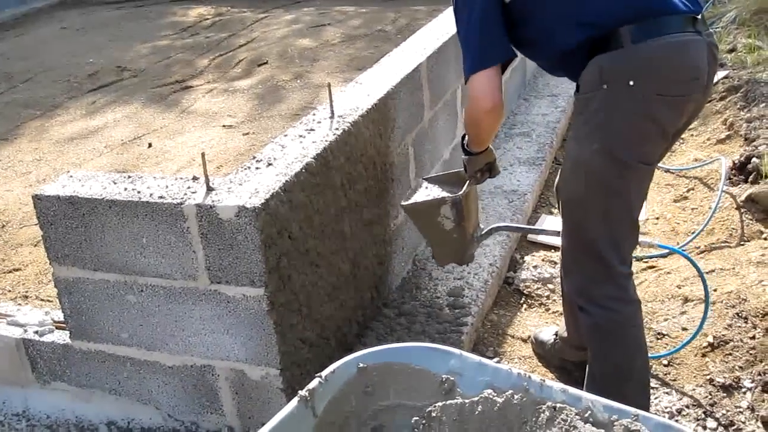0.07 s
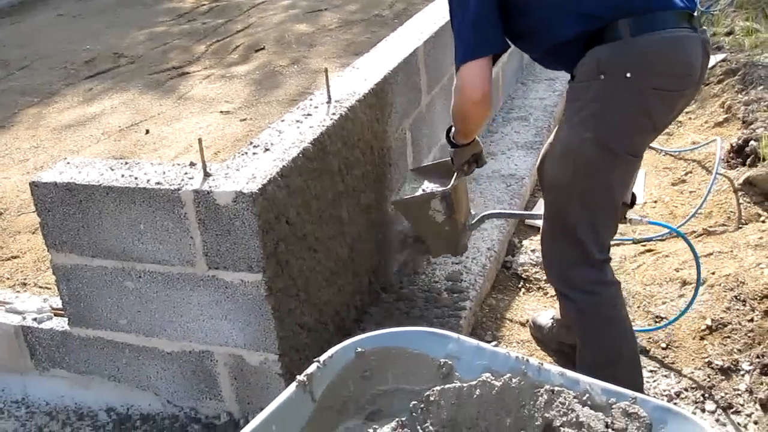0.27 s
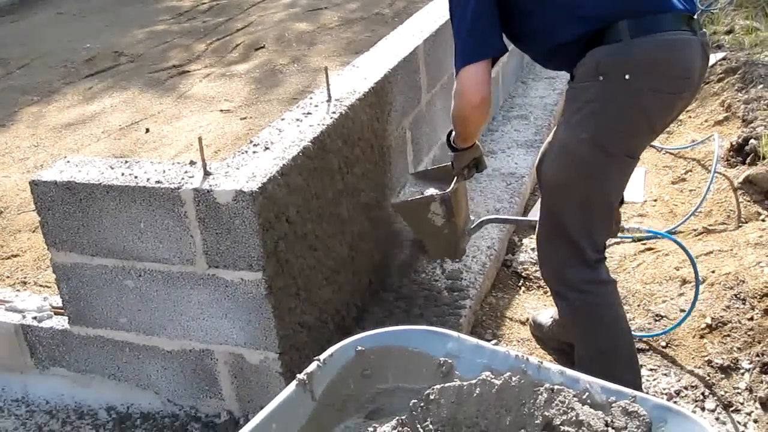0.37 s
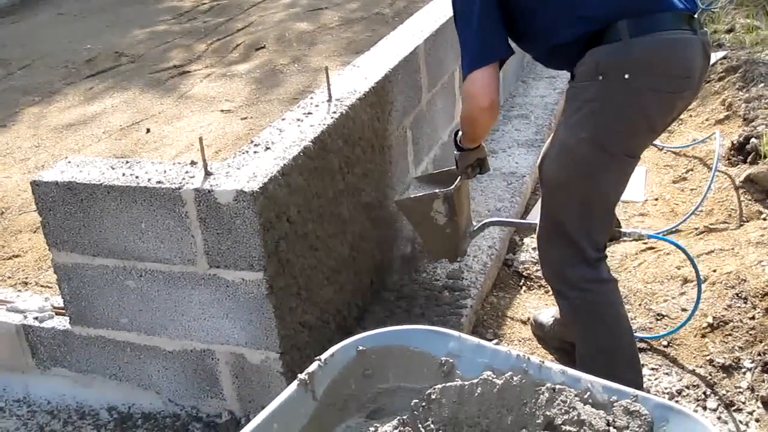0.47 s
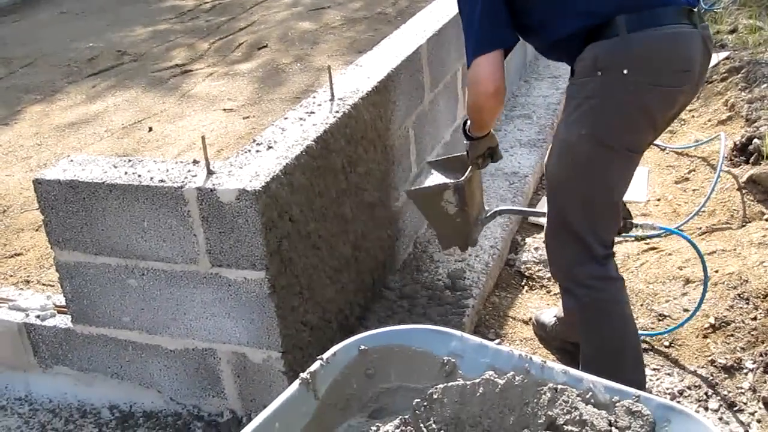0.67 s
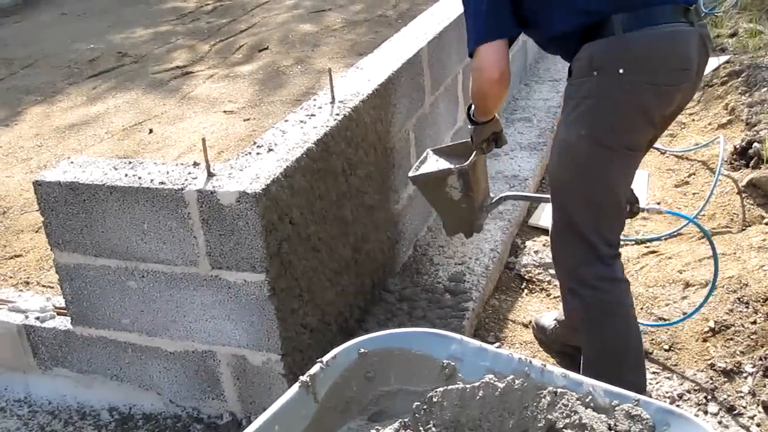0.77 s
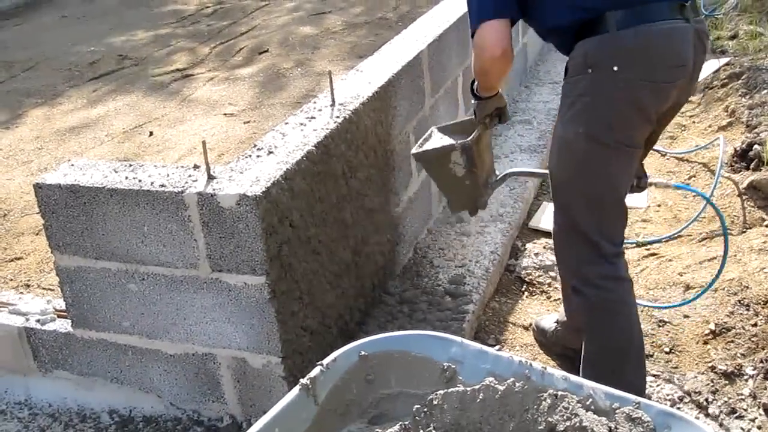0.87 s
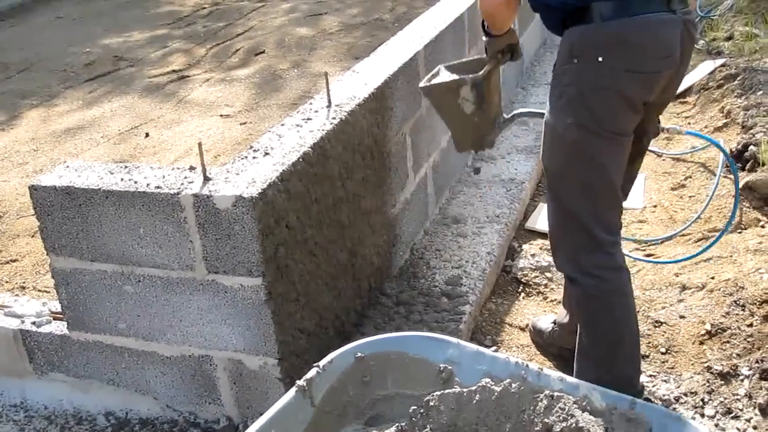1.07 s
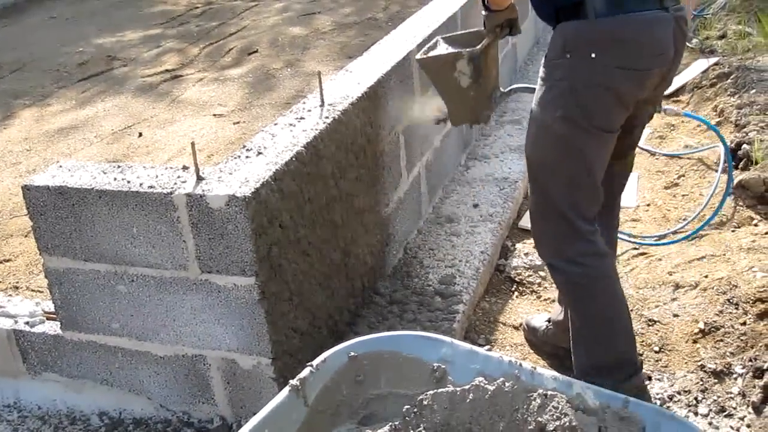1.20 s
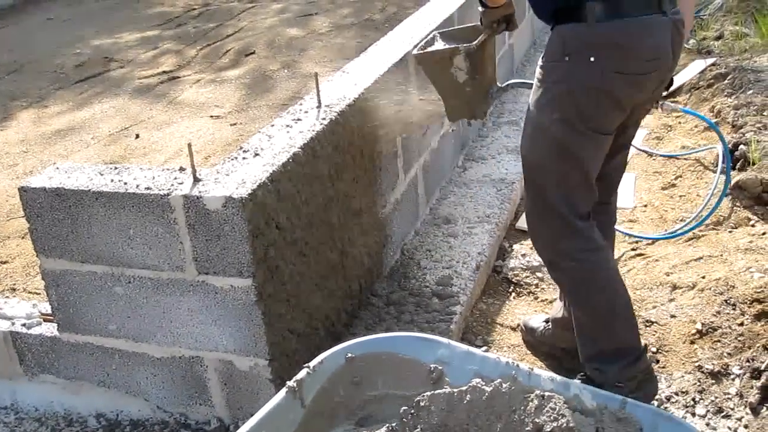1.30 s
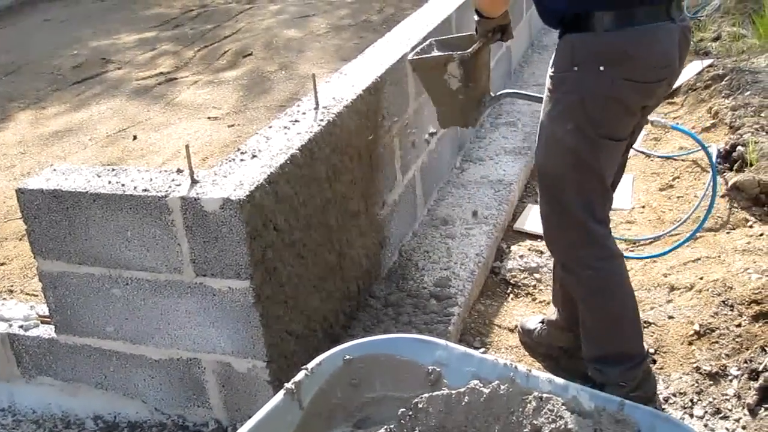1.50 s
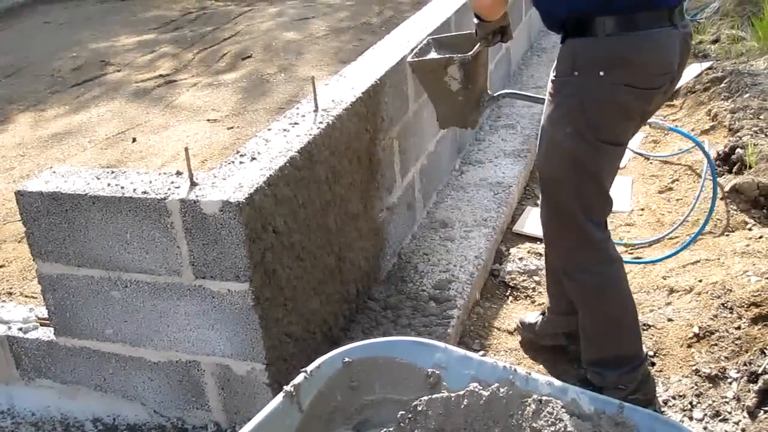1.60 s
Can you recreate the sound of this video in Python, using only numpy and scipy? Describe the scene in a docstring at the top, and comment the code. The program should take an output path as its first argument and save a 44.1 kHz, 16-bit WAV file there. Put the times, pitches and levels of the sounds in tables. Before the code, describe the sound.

A mortar sprayer fires two short, sputtering air blasts while a distant bird chirps.

```python
"""A hopper sprayer shoots mortar at a block wall in two short blasts of compressed air.
The jet hisses through the steel hopper, sputters on wet lumps and throws grit, while the hopper
throbs and the mortar gurgles and gulps. Heard from one microphone out in the yard, with the sprayer
in the foreground and a brief echo behind it. Farther off, a small bird whistles over a quiet background."""
import sys
import numpy as np
from scipy import signal
from scipy.fft import rfft, irfft
from scipy.io import wavfile
from scipy.ndimage import uniform_filter1d

SR = 44100
rng = np.random.default_rng(int(sys.argv[2]) if len(sys.argv) > 2 else 0)


def to_wav(sig):
    """Store sig (one row per channel, or 1-D mono) as 16-bit WAV at the path in sys.argv[1].

    Samples outside -1..1 are clipped; the rate is SR.
    """
    pcm = np.clip(np.atleast_2d(sig), -1, 1) * 32767
    pcm = np.round(pcm).astype(np.int16)
    wavfile.write(sys.argv[1], SR, pcm.T)  # frames by channels


N = 72765
NOW, FREQS = np.arange(N) / SR, np.fft.rfftfreq(N, 1 / SR)


def amp(db):
    """Decibels to gain."""
    return 10 ** (np.asarray(db) / 20)


def unit_rms(x):
    """Scales to rms 1."""
    return x / np.sqrt(np.mean(x ** 2) + 1e-20)


def curve(points, hz=FREQS):
    """Reads a table on a log-frequency axis."""
    f, value = np.transpose(points)
    return np.interp(np.log(hz + 1), np.log(f + 1), value)


def lifts(bands):
    """Sum of bell-shaped lifts over frequency, in dB."""
    return sum(db / (1 + (2 * (FREQS - hz) / width) ** 2) for hz, width, db in bands)


def coloured(x, spectrum_db):
    """Filters x by a dB curve, then scales to rms 1: only the curve's shape counts."""
    return unit_rms(irfft(rfft(x) * amp(spectrum_db), N))


def drift(rate_hz):
    """Smooth random wander up to a rate, rms 1."""
    return unit_rms(irfft(rfft(rng.standard_normal(N)) / (1 + (FREQS / rate_hz) ** 4), N))


def echo(x, t60s):
    """Diffuse reflections, each band dying at its own speed."""
    hz, t, noise = signal.stft(rng.standard_normal(SR), SR, nperseg=256)
    decay = np.exp(-np.log(1000) * t / curve(t60s, hz)[:, None])
    tail = signal.istft(noise * decay, SR, nperseg=256)[1]
    return signal.fftconvolve(x, tail / np.linalg.norm(tail))[:N]


# background noise (frequency [Hz], relative level [dB])
BACKGROUND_SPECTRUM = [(15, -36), (25, -2.5), (64, 2), (140, -4.5), (253, 2), (482, -4), (552, 1),
                       (826, -3), (1200, -4), (2300, -13), (4040, -8), (5730, -13), (10400, -18.5),
                       (13200, -22), (15500, -30)]
# faint, steady high bands in the background hiss (centre [Hz], width [Hz], lift [dB])
HISS_LIFTS = [(6900, 700, 3), (9600, 350, 6), (10200, 770, -4), (13250, 600, 5.5)]
def background():
    """The quiet, steady noise floor under everything else."""
    return amp(-60.5) * coloured(rng.standard_normal(N), curve(BACKGROUND_SPECTRUM) + lifts(HISS_LIFTS))


# reflections off walls near the bird (delay [s], gain [dB])
WALL_BOUNCES = [(0.028, -8), (.083, -18), (.116, -21)]
# diffuse tail of the song (frequency [Hz], t60 [s])
BIRD_DECAY = [(3000, 0.54), (7000, 0.59)]
def bird_echo(song, centre_hz=4330, half_width_hz=260):
    """The whistles bounce off walls, most clearly around their held pitch, and ring on."""
    band = 1 / (1 + ((FREQS - centre_hz) / half_width_hz) ** 2)
    held = irfft(rfft(song) * band, N)
    bounces = sum(amp(db) * np.pad(held, (round(delay * SR), 0))[:N] for delay, db in WALL_BOUNCES)
    return bounces + amp(-11.5) * echo(song, BIRD_DECAY)


# the song, one list a note (time [s], pitch [Hz], level [dB])
BIRD_NOTES = [
    [(.068, 5720, -70), (.094, 5720, -56), (.11, 6550, -67), (.123, 7100, -66), (.135, 5750, -58),
     (.144, 4200, -70)],
    [(.159, 4900, -65), (.167, 4800, -56), (.178, 4800, -63)],
    [(.543, 4180, -53), (.570, 3930, -54), (.589, 4980, -53), (.61, 4710, -56), (.631, 4690, -42.5),
     (.645, 4630, -53)],
    [(.714, 5250, -69), (.738, 4540, -47.5), (.783, 4210, -45.5), (.806, 4345, -43), (.818, 3950, -43.5),
     (.83, 2660, -66)],
    [(.894, 5310, -67), (.918, 4540, -46), (.953, 4310, -46), (.968, 4280, -55), (.991, 4270, -41.5),
     (1.009, 3110, -54.5)],
    [(1.07, 3400, -64), (1.102, 3090, -47.5), (1.128, 3620, -44.5), (1.144, 4400, -47), (1.155, 6330, -52)],
    [(1.455, 3155, -48), (1.488, 4160, -48.5), (1.504, 6770, -60), (1.518, 5340, -52), (1.536, 4370, -53)],
    [(1.602, 2490, -59), (1.618, 4360, -48.5), (1.63, 4100, -48.5), (1.65, 3195, -49)],
]
def bird(edge_s=.003):
    """A small bird in the distance: pure gliding whistles that waver slightly."""
    song = np.zeros(N)
    for note in BIRD_NOTES:
        s, hz, db = np.transpose(note)
        glide = uniform_filter1d(np.interp(NOW, s, hz), size=400)
        pitch = glide * (1 + 0.0018 * drift(rate_hz=160))
        gate = np.clip(np.minimum(NOW - s[0], s[-1] - NOW) / edge_s + 1, 0, 1)
        level = amp(np.interp(NOW, s, db) + drift(rate_hz=38))
        song += gate * level * np.sin(2 * np.pi * np.cumsum(pitch) / SR)
    return song + bird_echo(song)


# reverberation of the yard (frequency [Hz], t60 [s])
YARD_DECAY = [(80, 1), (180, 0.22), (1500, 0.55), (4000, 0.56), (8000, 0.53), (15000, 0.38)]
def yard(x):
    """The yard throws a brief, diffuse echo back to the microphone."""
    return echo(x, YARD_DECAY)


# air pockets (time [s], pitch [Hz], level [dB], half-length [s])
AIR_POCKETS = [(.338, 226, -29, 0.008), (0.413, 261, -27, 0.0054), (.415, 573, -25, 0.0025),
               (.437, 264, -25.5, 0.004), (.466, 193, -34, 0.0062), (0.506, 340, -51.5, 0.014),
               (1.251, 590, -22.5, 0.0029)]
def gulps():
    """Pockets of air gulp through the mortar as the hopper empties."""
    pops = np.zeros(N)
    for s, hz, db, half_length in AIR_POCKETS:
        t = NOW - s
        pops += amp(db) * np.exp(-(t / half_length) ** 2) * np.sin(2 * np.pi * (hz * t + rng.random()))
    return pops + amp(-12) * yard(pops)


# wet gurgle (frequency [Hz], relative level [dB])
GURGLE_SPECTRUM = [(40, -30), (130, -7.5), (300, 9.5), (380, -8), (450, -0.5), (650, 5), (850, -16),
                   (1500, -17), (3000, -48)]
def gurgle(flow):
    """Low, wet noise that follows the airflow."""
    return amp(-20) * flow * coloured(rng.standard_normal(N), curve(GURGLE_SPECTRUM))


# swell of the hopper's throb, one list a blast (time [s], level [dB])
THROB_LEVELS = [
    [(.182, -52), (.205, -47.5), (.25, -37.5), (.305, -36.5), (.35, -42), (.46, -46), (.525, -56),
     (.565, -69)],
    [(1.155, -62), (1.185, -47), (1.22, -31.5), (1.3, -41), (1.42, -43), (1.455, -88)],
]
def hopper_throb(pull, pitch_hz=85.5, wander_hz=2.9, flutter=0.43):
    """The loaded hopper throbs low and unevenly with the blast numbered by pull."""
    s, db = np.transpose(THROB_LEVELS[pull])
    cycles = np.cumsum(pitch_hz + wander_hz * drift(rate_hz=23)) / SR
    level = amp(np.interp(NOW, s, db, left=-np.inf, right=-np.inf))
    return level * (1 + flutter * drift(rate_hz=43)) * np.sin(2 * np.pi * cycles)


# grains landing on the wall (frequency [Hz], relative level [dB])
SPATTER_SPECTRUM = [(200, -57), (700, -9), (1300, -6), (2500, 0.5), (5000, -2.5), (9000, -2.5),
                    (15000, -31)]
def spatter(t, grains_per_s=5000, spread_db=1.5, slug_fade_s=0.086):
    """Wet sand strikes the wall: a first slug of mortar fades to light grit."""
    hits = (rng.random(N) < grains_per_s / SR) * rng.choice([-1, 1], N)
    sizes = amp(spread_db * np.minimum(rng.exponential(1, N), 4))
    grit = amp(-19)
    slug = amp(-4) * np.exp(-np.maximum(t, 0) / slug_fade_s)
    return (grit + slug) * coloured(hits * sizes, curve(SPATTER_SPECTRUM))


# big lumps choke the jet (-) or clear the nozzle (+) (time [s], level change [dB])
BIG_LUMPS = [(0.21, 4.5), (0.228, 3), (.241, -1), (0.254, 2), (0.284, 2.5), (0.303, -4.5), (0.309, 5),
             (0.321, -1.5), (.382, 2.5), (0.419, 3.5), (1.186, 3.5), (1.228, 3), (1.326, 0), (1.345, 1.5),
             (1.356, -2.5)]
def sputter(half_length_s=.0045, rate_hz=75, depth_db=.9):
    """Gain of the spray: small lumps choke it dozens of times a second, big ones make it stall and spit."""
    big = sum(db * np.exp(-((NOW - s) / half_length_s) ** 2) for s, db in BIG_LUMPS)
    around_rate_db = -3 * np.log2((FREQS + 1) / rate_hz) ** 2
    small = depth_db * coloured(rng.standard_normal(N), around_rate_db)
    return amp(big + small)


# the jet flickers more in the treble (frequency [Hz], depth [dB])
JET_FLICKER = [(1500, 1.0), (4000, 1.2), (7000, 2.4), (13000, 2.9)]
def jet(spectrum_db):
    """Turbulent air, broken into flickering patches by passing lumps."""
    hz, _, noise = signal.stft(rng.standard_normal(N), SR, nperseg=256)
    patches = uniform_filter1d(rng.standard_normal(noise.shape), size=8, axis=0)  # across frequency
    patches = unit_rms(uniform_filter1d(patches, size=2, axis=1))  # across time
    flicker = amp(curve(JET_FLICKER, hz)[:, None] * patches)
    air = signal.istft(noise * flicker, SR, nperseg=256)[1][:N]
    return coloured(air, spectrum_db)


def airflow(t, opening, held, db, sag, closing, leak_lead_s=.009, leak_rise_s=.004, kick_s=0.007):
    """The valve leaks a little, opens with a kick, the pressure sags, the valve shuts."""
    opened = .5 * (1 + np.tanh(t / (2 * opening)))
    leak = amp(-34) * .5 * (1 + np.tanh((t + leak_lead_s) / (2 * leak_rise_s)))
    since = np.maximum(t, 0)
    kick_db = np.exp(-since / kick_s)  # air stored in the hose adds a 1 dB push
    return (opened + leak) * amp(db + kick_db - sag * since - closing * np.maximum(t - held, 0))


# the valve (half open at [s], opening time [s], held [s], level [dB], sag [dB/s], closing [dB/s])
TRIGGER_PULLS = [(0.2071, 0.0032, 0.23, -19, 27, 440), (1.206, 0.01, 0.17, -18.5, 23, 497)]
# the jet as heard from the foot and the top of the wall (frequency [Hz], relative level [dB])
FOOT_SPECTRUM = [(18, -64), (30, -34), (81, -5), (120, -6.5), (292, 0.5), (379, -28), (443, -4), (1050, -9),
                 (1330, -5.5), (2300, -4.5), (3880, 4), (5310, -2.5), (9680, -8.5), (11600, -5.5),
                 (15500, -14.5)]
TOP_SPECTRUM = [(18, -48), (30, -24), (81, -6.5), (192, -6.5), (420, -8), (518, -2), (852, -10), (1590, -7),
                (2020, -9.5), (2300, -10), (2620, -6.5), (3980, -8), (4910, -9), (11900, -13), (15500, -20)]
# hopper and nozzle resonances at each position (centre [Hz], width [Hz], lift [dB])
FOOT_RESONANCES = [(247, 140, 1.5), (1315, 128, 14), (1605, 184, 10), (3290, 160, 5.5), (3710, 84, 6),
                   (3950, 170, 6), (6470, 250, 7), (7250, 320, 7.5), (8000, 140, 4), (12500, 1900, 3)]
TOP_RESONANCES = [(1067, 132, 11.5), (1587, 240, 10), (2326, 200, 9.5), (2650, 100, -2.5), (2970, 300, 7),
                  (3970, 210, 11.5), (6150, 440, 6.5), (6700, 210, 4.5), (8000, 300, 6.5),
                  (11700, 940, 8.5), (13430, 600, 8.5)]
# the yard's answer to each blast (gain [dB])
YARD_GAINS = [-21.5, -16]
def sprayer(gurgle_lag_s=0.032):
    """In the foreground: one blast low against the wall, one near its top, each ringing the hopper."""
    positions = [(FOOT_SPECTRUM, FOOT_RESONANCES), (TOP_SPECTRUM, TOP_RESONANCES)]
    out = np.zeros(N)
    for pull, (spectrum, resonances) in enumerate(positions):
        start, *valve = TRIGGER_PULLS[pull]
        t = NOW - start
        flow = airflow(t, *valve)
        out += flow * sputter() * (jet(curve(spectrum) + lifts(resonances)) + spatter(t))
        out += gurgle(airflow(t - gurgle_lag_s, *valve))  # outlasts the jet
        out += hopper_throb(pull)
        out += amp(YARD_GAINS[pull]) * yard(flow * jet(curve(spectrum)))
    return out + gulps()


def scene():
    """Sprayer, bird and background, in mono."""
    return (sprayer() + bird() + background())[None]


def record(dry, cutoff_hz=15780):
    """The recorder's band limit: a steep low-pass."""
    lowpass = signal.firwin(801, cutoff_hz, window=("kaiser", 9), fs=SR)
    return signal.oaconvolve(dry, lowpass[None], "same")


dry = scene()
out = record(dry)
to_wav(out)
```